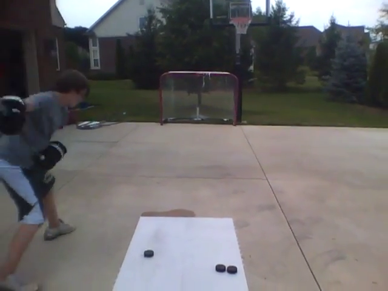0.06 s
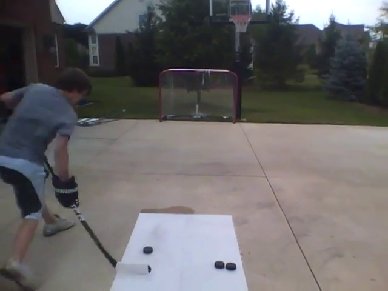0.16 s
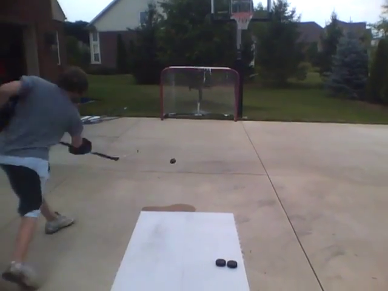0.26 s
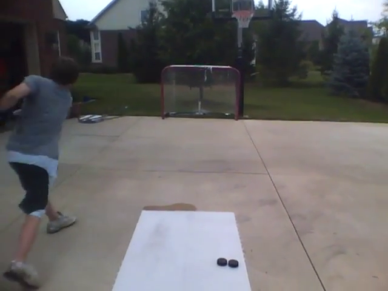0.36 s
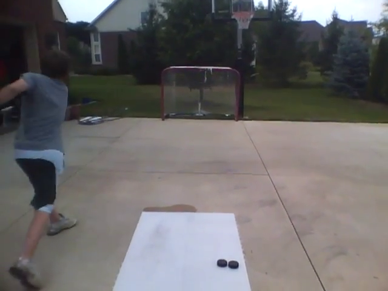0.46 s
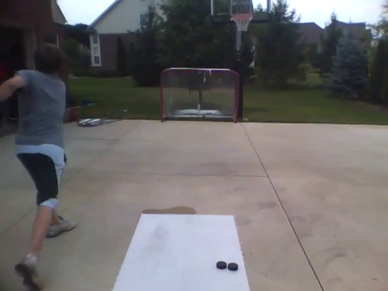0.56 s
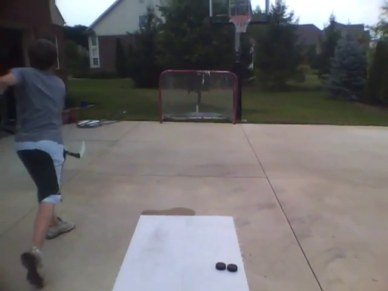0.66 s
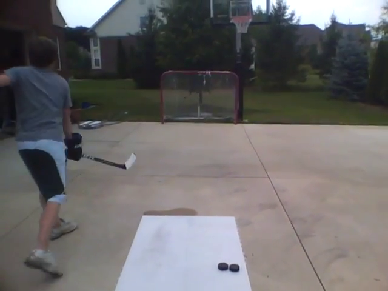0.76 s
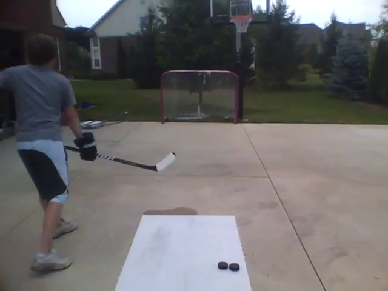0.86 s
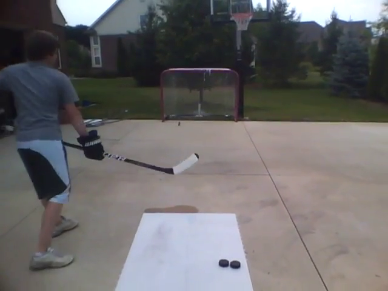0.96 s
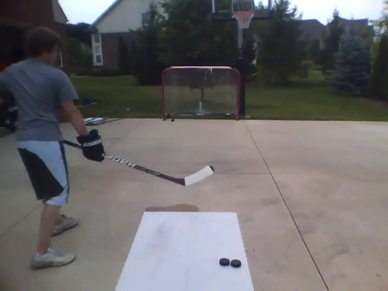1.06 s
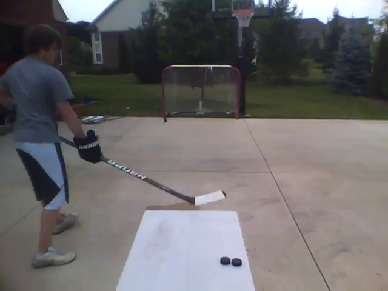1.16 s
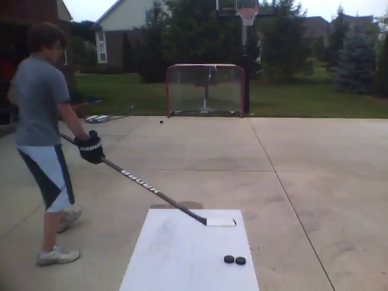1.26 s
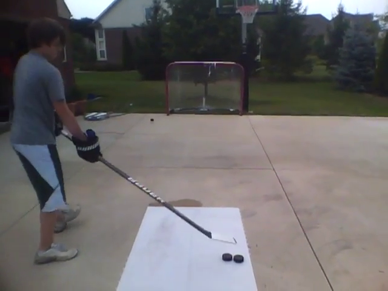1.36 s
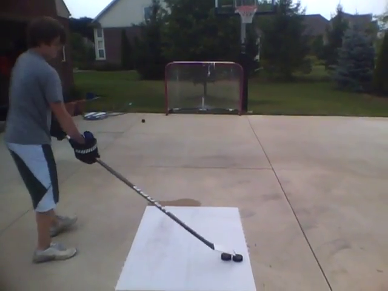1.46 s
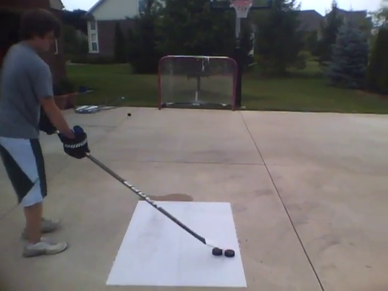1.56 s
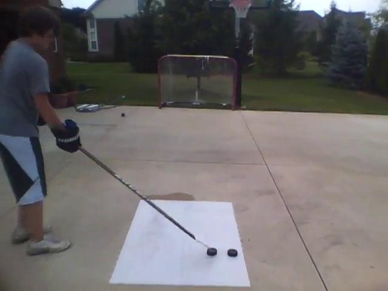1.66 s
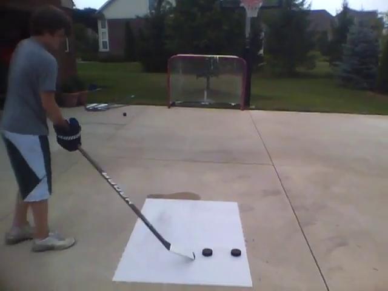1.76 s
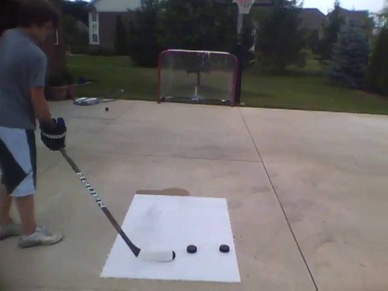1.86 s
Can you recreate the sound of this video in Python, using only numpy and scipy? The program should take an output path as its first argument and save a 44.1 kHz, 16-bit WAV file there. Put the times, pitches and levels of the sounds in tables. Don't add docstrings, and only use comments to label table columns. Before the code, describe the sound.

A hockey stick slaps a puck off a plastic pad with a loud distorted crack, echoing off ground and garage; a tick into the net, foot thuds, a shoe squeak, then the blade knocks other pucks.

```python
import sys
import numpy as np
from scipy import signal
from scipy.fft import rfft, irfft
from scipy.io import wavfile
from scipy.ndimage import uniform_filter1d

SR = 44100
rng = np.random.default_rng(int(sys.argv[2]) if len(sys.argv) > 2 else 0)


def put_to_file(sound):
    columns = np.atleast_2d(sound).T
    safe = np.clip(columns, -1, 1)
    whole_steps = np.round(safe * 32767)
    wavfile.write(sys.argv[1], SR, whole_steps.astype(np.int16))


def rack_gain(trim_db):
    fader = np.asarray(trim_db, float)
    return 10 ** (fader / 20)


N = 83790


def evened(x):
    return x / np.sqrt(np.mean(x ** 2) + 1e-20)


def noise(size=N):
    return rng.standard_normal(size)


def seconds(size):
    return np.arange(size) / SR


def decay(t, t60_s):
    return rack_gain(-60 * t / t60_s)


def read(points, hz):
    f, value = np.transpose(points)
    return np.interp(np.log(hz + 1), np.log(f + 1), value)


def add(mix, start_s, sound):
    part = mix[round(start_s * SR):][:len(sound)]
    part += sound[:len(part)]


def colour(x, points):
    hz = np.fft.rfftfreq(len(x), 1 / SR)
    return irfft(rfft(x) * rack_gain(read(points, hz)), len(x))


def resonate(x, hz, width_hz):
    turn = np.exp(2j * np.pi * hz * seconds(len(x)))
    r = np.exp(-np.pi * width_hz / SR)
    return 2 * (turn * signal.lfilter([1 - r], [1, -r], x / turn)).real


def grit(size, per_s, spread_db):
    hit, sign, size_draw = rng.random((size, 3)).T
    level = rack_gain(-spread_db * np.log(size_draw + 0.0072))
    return evened((hit < per_s / SR) * np.sign(sign - .5) * level)


# (frequency [Hz], density [dB per Hz])
HISS_COLOUR = [(12, -34), (20, 1), (49, -7.5), (293, -7.5), (607, -13.5), (780, -12.5), (976, -17),
               (2910, -15.5), (16000, -30.5)]
HISS_DB = -50.5
# (time [s], level [dB])
BREEZE = [(0.0, -55), (0.2, -40.5), (0.348, -44), (0.528, -45), (0.608, -47), (0.8, -54), (1.1, -54),
          (1.36, -57), (1.524, -68), (1.78, -60), (1.9, -66)]


def air():
    hiss = rack_gain(HISS_DB) * evened(colour(noise(), HISS_COLOUR))
    lumps = rack_gain(5.2 * evened(colour(noise(), [(2, -2.5), (12, 20.5), (30, -57), (100, -120)])))
    rumble = colour(noise(), [(15, -20), (40, -0.5), (110, -0.5), (250, -11.0), (600, -57.5)])
    level_db = np.interp(seconds(N), *np.transpose(BREEZE))
    return hiss + rack_gain(level_db) * evened(rumble * lumps)


# (start [s], length [s], level [dB], colour shift [ratio], brightness [dB])
SCUFFS = [
    (.004, 0.065, -27.5, 0.93, 7),
    (0.654, 0.034, -39.5, 0.25, -9),
    (0.134, 0.11, -37, 0.94, 2),
    (0.652, 0.057, -35, 0.75, 20),
    (0.858, 0.041, -38, 0.34, 13),
    (0.891, 0.054, -33.5, 0.91, -11),
    (0.992, 0.062, -51, 0.31, 6),
    (1.554, 0.072, -51.5, 0.25, 5),
    (1.692, 0.094, -41, 0.49, 10.5),
    (1.81, 0.1, -37, 0.4, 10),
]
# (frequency [Hz], width [Hz], level [dB])
SOLE = [(1412, 560, 1), (2590, 610, -2.5), (3520, 1800, 7), (5180, 380, -5), (11000, 9400, -16)]


def scuffs():
    track = np.zeros(N)
    for start_s, length_s, db, shift, bright_db in SCUFFS:
        t = np.arange(0, length_s, 1 / SR)
        clicks = grit(8192, per_s=6000, spread_db=1.2)
        flutter = 1 + 0.2 * evened(uniform_filter1d(noise(8192), 150))
        drive = (clicks * flutter)[:len(t)]
        body = np.zeros(len(t))
        for hz, width_hz, mode_db in SOLE:
            moved_hz = hz * min(shift, 1.3)
            mode = resonate(resonate(drive, moved_hz, width_hz), moved_hz, 2 * width_hz)
            body += rack_gain(mode_db + bright_db * (hz > 6000)) * evened(mode)
        swell = np.sin(np.pi * (t / length_s) ** 0.83) ** 0.55
        add(track, start_s, rack_gain(db) * evened(body) * swell)
    return track


# (time [s], peak [dB], pitch [Hz], length [cycles])
THUDS = [(0.107, -36, 90, 1.3), (0.132, -32.5, 111, 1.1), (0.442, -31.5, 150, 1.8), (0.474, -26, 118, 1.3),
         (0.519, -23.5, 136.5, 2.1), (0.559, -29, 243, 2.25), (0.643, -31, 50, 1.1),
         (.657, -29, 199.6, 1.75), (0.583, -25, 282, 1.4), (.03, -37, 80, 2.9), (0.673, -20.5, 330, 2.5),
         (.697, -28, 128, 0.92), (0.774, -33, 283, 1.7), (.864, -27.5, 300, 2.4), (0.878, -28, 275, 4.2),
         (.948, -20.5, 157.4, 1.6), (1.002, -28.5, 247, 1.1), (1.015, -33, 310, 1.5),
         (1.087, -41.5, 78.5, 1.2), (1.26, -35, 376, 2.8), (1.317, -27, 91, 0.95), (1.322, -29, 258, 2),
         (1.431, -42, 256, 3.9)]


def thuds():
    track = np.zeros(N)
    t = np.arange(-400, 400) / SR
    for time_s, db, hz, cycles in THUDS:
        push = np.sin(2 * np.pi * hz * t + 0.75) * np.exp(-(3.8 * t * hz / cycles) ** 2)
        add(track, time_s - 400 / SR, -rack_gain(db) * push)
    return track


# (time [s], peak [dB], pitch [Hz], ring t60 [s], glide [ratio])
TICKS = [(.0865, -35, 1990, 0.0067, 0.65), (0.5823, -15.5, 3300, .008, 0.85),
         (0.1917, -18, 4200, 0.008, 0.86), (0.534, -26.5, 8500, .012, 0.9),
         (.582, -13.5, 2040, 0.019, 0.97), (.582, -13, 4790, 0.011, 1.03),
         (0.5818, -21, 6600, 0.0074, 0.95), (0.5822, -29, 11000, 0.0063, 1.01),
         (0.596, -25, 2000, 0.0077, 1.01), (.772, -46, 7000, .006, 1.01), (.999, -41, 6000, .006, 1.1),
         (1.278, -40, 1010, 0.016, 0.93), (1.466, -26.5, 4380, 0.006, 1.1), (1.475, -26, 4730, .006, 0.66),
         (1.859, -28, 2156, 0.014, 1.08), (.862, -33, 1190, 0.017, 1.1)]


def ticks():
    track = np.zeros(N)
    t = seconds(1500)
    for time_s, db, hz, t60_s, glide in TICKS:
        u = rng.random((7, 2, 1))
        turns = np.cumsum(1 + (glide - 1) * np.minimum(t / 0.0065, 1)) * hz / SR
        ring = np.sin(2 * np.pi * (turns * (.86 + 0.31 * u[:, 0]) + u[:, 1])).sum(0)
        ring += .5 * np.diff(noise(len(t) + 1)) * decay(t, 0.0037)
        ring *= np.minimum(t / 0.00031, 1) * decay(t, t60_s)
        add(track, time_s, rack_gain(db) * ring / abs(ring).max())
    return track


SLAP_S, SLAP_DB = .2298, 18.5
# (frequency [Hz], density [dB per Hz])
SLAP_COLOUR = [(35, -76.5), (60, -15.5), (1200, -6.5), (1700, -9.5), (2190, -9), (3270, -8), (3850, -8),
               (4750, -19.5), (9000, -24), (16000, -31)]


def slap():
    t = seconds(4096)
    drag = grit(len(t), 12000, 2.04) * rack_gain(-20 * t / 0.013)
    crack = colour(drag, SLAP_COLOUR) * np.minimum(t / 0.00028, 1) * np.clip((t[-1] - t) / .02, 0, 1)
    return rack_gain(SLAP_DB) * 4 * crack / np.linalg.norm(crack)


def boom():
    t = seconds(4096)
    return rack_gain(4.5) * decay(t, 0.049) * np.sin(2 * np.pi * 86.4 * t)


# (delay [s], level [dB])
WALLS = [(.0035, -3.5), (.0085, -0.5), (.0115, 1), (0.0173, 3), (.021, -14.5), (.028, -5.5), (0.035, -13.5),
         (0.059, -12), (.068, -20.5), (0.099, -21.5)]


def near_walls():
    response, shot_returns = np.zeros(SR // 4), np.zeros(N)
    for delay_s, db in WALLS:
        add(response, delay_s, rack_gain(db) * grit(120, 12000, 1.44) / 11)
        add(shot_returns, SLAP_S + delay_s, rack_gain(db - 2.0) * slap())
    return response, shot_returns


def tail(decays, delay_s):
    hz, t, z = signal.stft(grit(2 * SR, 5000, 1.6), SR, nperseg=256)
    fading = z * decay(t, read(decays, hz)[:, None])
    x = signal.istft(fading, SR, nperseg=256)[1][:2 * SR]
    x = x * np.clip(seconds(len(x)) / delay_s, 0, 1)
    return x / np.linalg.norm(x)


GARAGE_DB, STREET_DB = -1, -16
# (frequency [Hz], t60 [s])
GARAGE = [(100, 0.081), (500, 0.26), (1500, 0.28), (4000, 0.39), (9000, 0.38), (15000, 0.06)]
# (frequency [Hz], t60 [s])
STREET = [(100, 0.55), (500, 1.72), (1500, 1.79), (4000, 1.44), (9000, 1.12), (15000, 0.57)]


def reverb():
    return rack_gain(GARAGE_DB) * tail(GARAGE, 0.013) + rack_gain(STREET_DB) * tail(STREET, 0.02)


# (frequency [Hz], gain [dB])
YARD_COLOUR = [(200, -10), (480, -6), (660, -12), (900, -2), (1200, -1), (2300, -3.5), (3800, -4.5),
               (5200, -12.5), (9000, -18), (15500, -22.5)]


def yard(space):
    echo = colour(space, YARD_COLOUR) * np.minimum(np.arange(len(space)) / 200, 1)
    return rack_gain(SLAP_DB + 10.5) * echo / np.linalg.norm(echo)


# (start [s], length [s], level [dB], pitch [Hz], width [Hz])
PANELS = [(.237, 0.033, -7.5, 1200, 500), (.252, 0.02, -9, 750, 300), (.256, .03, -13, 500, 200),
          (.246, .03, -9, 2200, 500), (.284, 0.022, -10, 3800, 700), (.286, .02, -16, 5100, 700),
          (.28, .025, -14, 1100, 600), (.316, 0.024, -18.5, 2300, 360), (.322, .02, -17.5, 3700, 930),
          (.312, .012, -20.5, 5260, 450), (.345, 0.053, -26, 3650, 840), (.372, 0.012, -23.5, 1220, 930),
          (.436, .012, -27.5, 1100, 740), (.468, .012, -26.5, 1050, 660)]


def panels():
    track = np.zeros(N)
    for start_s, length_s, db, hz, width_hz in PANELS:
        t = np.arange(0, length_s, 1 / SR)
        drive = grit(4096, per_s=5000, spread_db=2.5)[:len(t)]
        body = resonate(resonate(drive, hz, width_hz), hz, 2 * width_hz)
        swell = np.sin(np.pi * (t / length_s) ** 0.72) ** 0.62
        add(track, start_s, rack_gain(db) * evened(body) * swell)
    return track


def squeak():
    t = np.arange(-300, 600) / SR
    hz = 4270 - 900 * np.tanh(t / 0.004)
    shape = np.where(t < 0, np.exp(-(t / 0.0012) ** 2), decay(t, 0.018))
    rough = 1 + 1.125 * uniform_filter1d(noise(len(t)), 8)
    return rack_gain(-14.5) * shape * np.sin(2 * np.pi * np.cumsum(hz) / SR) * rough


# (time [s], peak [dB], strongest [Hz], treble slope [dB per octave], ring t60 [s])
KNOCKS = [
    (1.5127, -22, 2518, -8, 0.026),
    (1.522, -22, 2700, -9, 0.06),
    (1.6464, -14, 2997, -10, 0.032),
    (1.647, -24.5, 596, -5, 0.043),
    (1.663, -23, 2030, -5, 0.024),
    (1.78, -11.5, 2870, -6.5, 0.044),
    (1.781, -17, 900, -12, 0.074),
    (1.797, -21.5, 5000, -11, 0.035),
]


def knocks():
    track = np.zeros(N)
    t = seconds(4096)
    for time_s, db, top_hz, slope_db, t60_s in KNOCKS:
        u = rng.random((120, 3, 1))
        hz = 260 * 55 ** ((np.arange(len(u))[:, None] + u[:, 0]) / len(u))
        octaves = np.log2(hz / top_hz)
        level_db = np.where(octaves > 0, slope_db, 6.5) * octaves + 4 * (u[:, 1] - .5)
        fall = decay(t, t60_s / (hz / top_hz) ** 0.37)
        modes = rack_gain(level_db) * fall * np.sin(2 * np.pi * (hz * t + 0.874 * u[:, 2]))
        body = modes.sum(0)
        add(track, time_s, rack_gain(db) * body / abs(body).max() * np.minimum(t / 0.00023, 1))
    return track


# (time [s], peak [dB], pitch [Hz], t60 [s])
RINGS = [(1.5146, -8.5, 1183, 0.023), (1.5146, -19, 1088, 0.083), (1.5135, -15.5, 460, 0.099),
         (1.5135, -21.5, 330, 0.068), (1.516, -21, 583, 0.088), (1.516, -21, 793, 0.074),
         (1.5225, -19, 914, 0.064), (1.5146, -28, 1330, .06), (1.5145, -28, 2950, .025),
         (1.536, -33, 2700, .03), (1.518, -33, 3900, .03), (1.5146, -26.5, 1548, 0.099),
         (1.515, -21.5, 2400, 0.028), (1.531, -16, 640, .035), (1.5415, -22.5, 595, 0.028),
         (1.6463, -9, 3500, .003), (1.6464, -15, 5400, .004), (1.6464, -22, 7200, .004),
         (1.649, -24, 3000, .03), (1.648, -18.5, 1000, 0.017), (1.648, -27.5, 465, 0.11),
         (1.648, -27, 820, 0.046), (1.648, -26.5, 1550, 0.066), (1.649, -28, 2130, .04),
         (1.6632, -15, 1900, .007), (1.7803, -13, 1300, .008), (1.782, -21, 1190, .06),
         (1.782, -24, 1420, .06), (1.781, -22, 2100, .04), (1.808, -28, 1350, .03),
         (1.78, -6.5, 700, 0.011), (1.78, -18, 412, .09), (1.781, -22.5, 656, .09),
         (1.781, -20, 815, 0.065), (1.786, -19, 1096, 0.045), (1.78, -18, 3300, .016),
         (1.78, -22, 2638, .03), (1.784, -27, 3030, .04), (1.7965, -22, 470, 0.046),
         (1.7985, -17, 720, .045), (1.812, -25, 675, 0.026), (.5822, -16, 3400, .004),
         (1.4662, -30, 2800, .003), (1.4752, -30, 2800, .003), (.8625, -26, 1000, .012),
         (.657, -31, 900, .04)]


def rings():
    track = np.zeros(N)
    t = seconds(4096)
    for time_s, db, hz, t60_s in RINGS:
        mode = np.sin(2 * np.pi * hz * t) * np.minimum(t / .00015, 1)
        add(track, time_s, rack_gain(db) * decay(t, t60_s) * mode)
    return track


def scene():
    breeze = air()
    small = scuffs() + ticks()
    add(small, .8948 - 300 / SR, squeak())
    soft = thuds()
    add(soft, SLAP_S, boom())
    shot = np.zeros(N)
    add(shot, SLAP_S, slap())
    hits = knocks() + rings()

    walls, back = near_walls()
    space = reverb()
    add(back, SLAP_S, yard(space))
    back += panels()
    dull = signal.lfilter([.25], [1, -.75], hits)
    echo = signal.fftconvolve(rack_gain(-12.0) * dull + rack_gain(-18.5) * small, walls)[:N]
    wet = signal.fftconvolve(rack_gain(-19.5) * dull + rack_gain(-19.0) * small, space)[:N]
    low_cut = signal.butter(3, 210, "high", fs=SR, output="sos")
    hard = signal.sosfilt(low_cut, hits + echo + wet + back)
    return (shot + hard + small + soft + breeze)[None]


def top_cut(x):
    return signal.sosfilt(signal.butter(12, 20000, fs=SR, output="sos"), x)


def record(dry):
    clipped = np.clip(dry, -.98, .98)
    band_limit = signal.firwin(255, 15900, fs=SR)
    mix = signal.oaconvolve(clipped, band_limit[None], "same")
    return top_cut(mix)


dry = scene()
out = record(dry)
put_to_file(out)
```